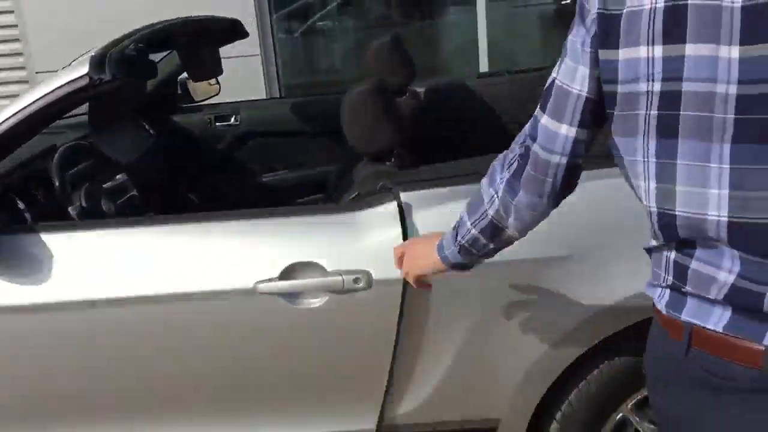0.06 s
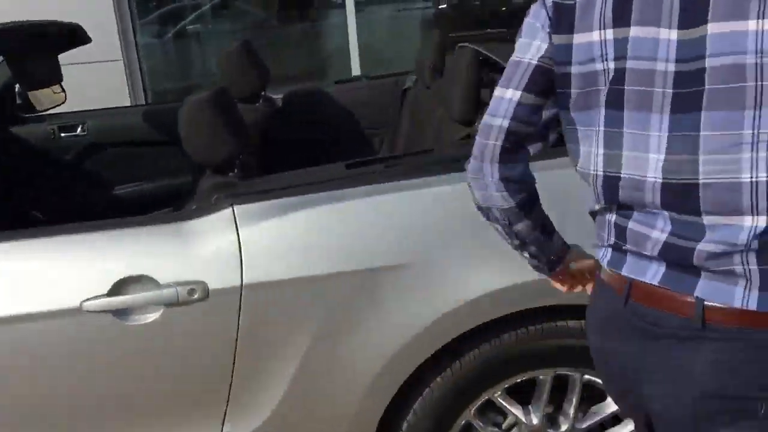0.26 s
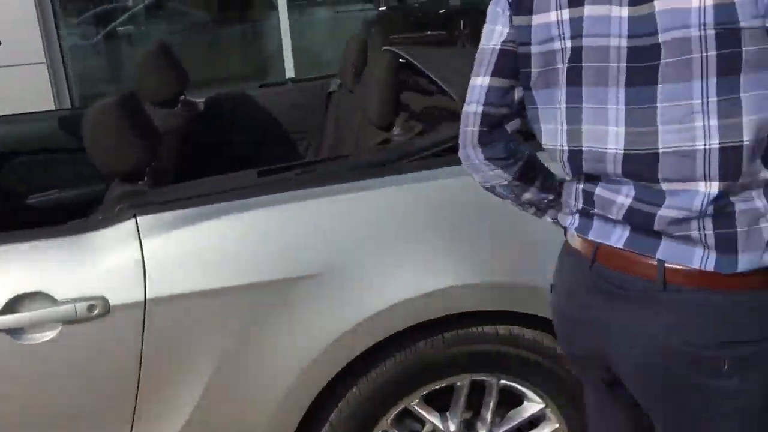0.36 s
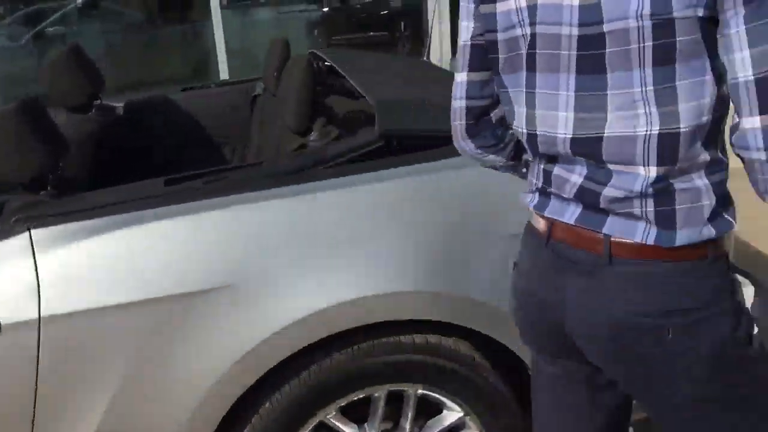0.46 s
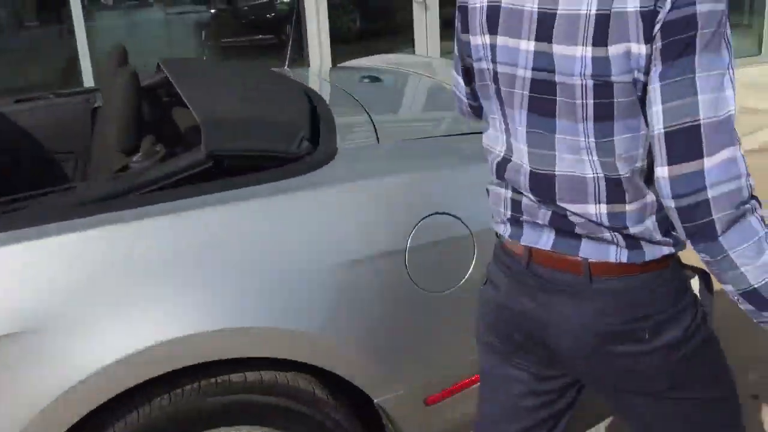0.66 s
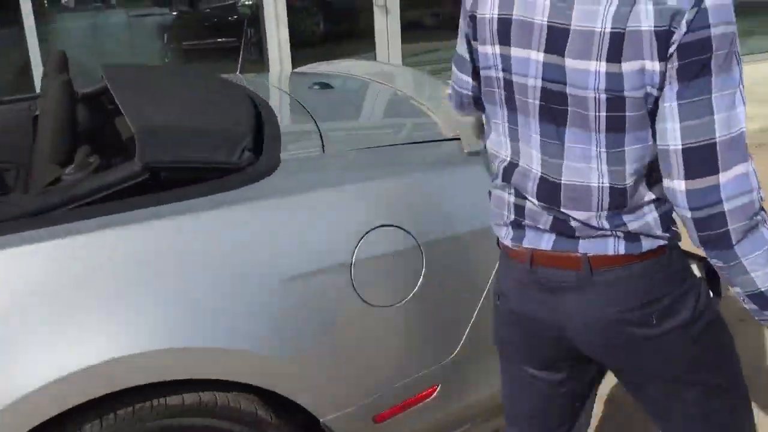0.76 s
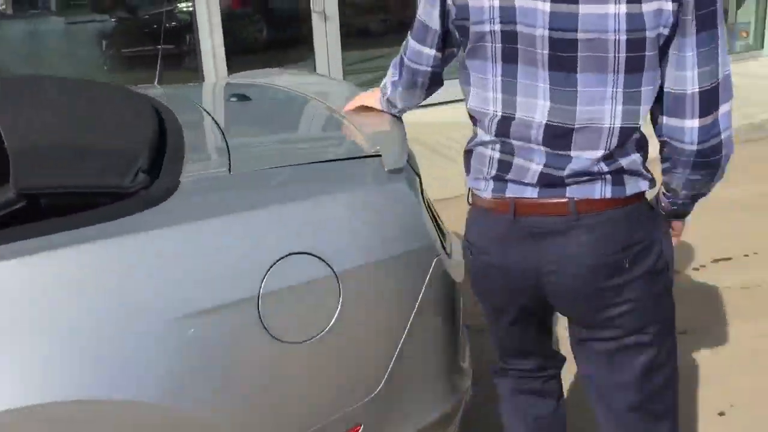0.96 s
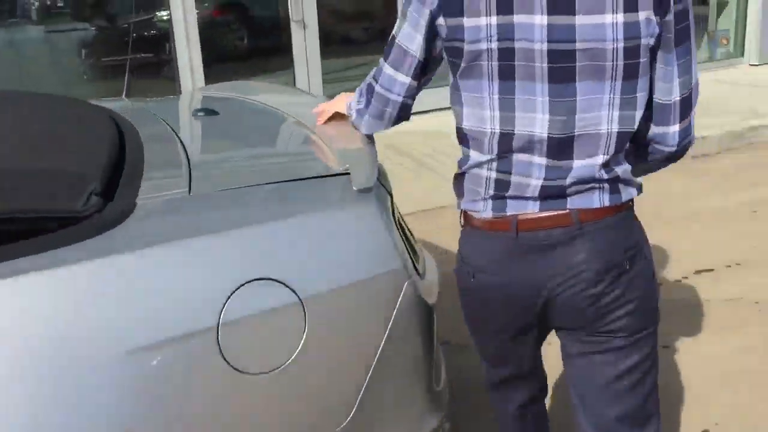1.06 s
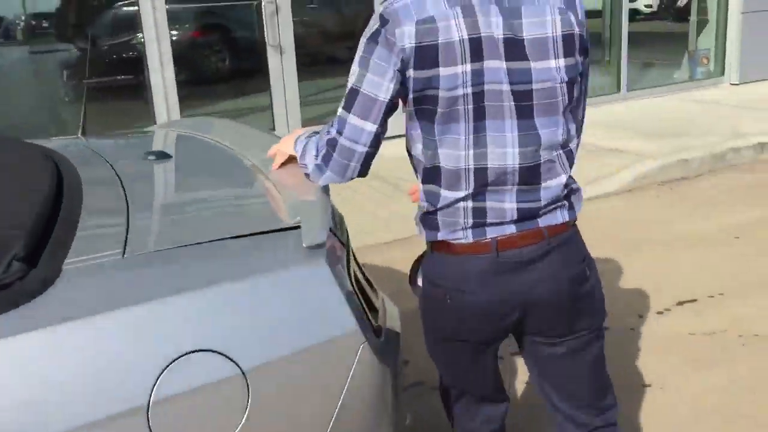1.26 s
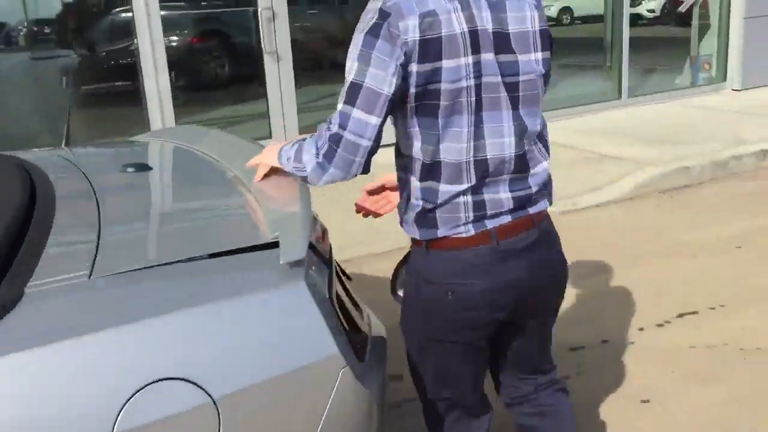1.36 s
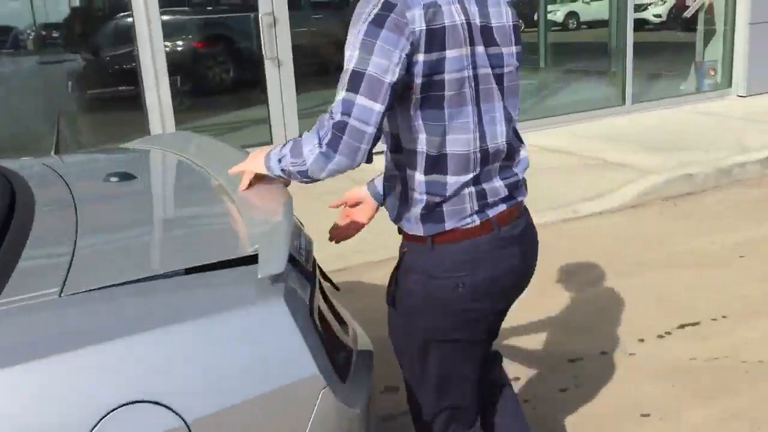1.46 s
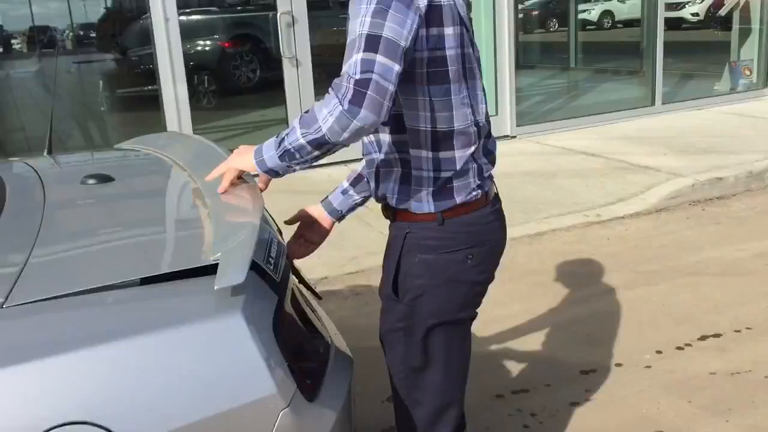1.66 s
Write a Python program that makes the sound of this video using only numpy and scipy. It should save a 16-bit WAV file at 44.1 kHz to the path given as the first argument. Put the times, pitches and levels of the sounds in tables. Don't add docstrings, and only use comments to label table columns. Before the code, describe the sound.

A car door slams at about 0.23 seconds: a sharp latch clack, heavy blows on the seal, booming cabin and rattling trim, settling by 0.4 with a short echo off a nearby wall. It overloads the close microphone. Wind thumps follow around 0.4 to 0.8, grit snaps and crunches underfoot near 1.24, and a strong wind thump hits at 1.47. Distant traffic hums and tyres hiss faintly.

```python
import sys
import numpy as np
from scipy import signal
from scipy.fft import rfft, irfft
from scipy.io import wavfile
from scipy.ndimage import uniform_filter1d

SR = 44100
rng = np.random.default_rng(int(sys.argv[2]) if len(sys.argv) > 2 else 0)


def how_loud(loudness_db):
    steps = np.asarray(loudness_db, float) / 20
    return 10 ** steps


def put_to_file(sound):
    columns = np.atleast_2d(sound).T
    safe = np.clip(columns, -1, 1)
    whole_steps = np.round(safe * 32767)
    wavfile.write(sys.argv[1], SR, whole_steps.astype(np.int16))


N = 74970
TIME = np.arange(N) / SR

# frequency in Hz, level in dB per Hz.
TRAFFIC_TONE = [(150, -4), (300, -9), (500, -13), (1050, -8), (2300, -21), (3500, -32), (6500, -43),
                (9000, -60)]
# time in seconds, level in dB.
TRAFFIC_SWELL = [(0.0, -48.5), (.45, -48.5), (.63, -48), (.93, -45.5), (1.3, -46), (1.48, -46), (1.7, -48)]
# frequency in Hz, level in dB per Hz.
TYRE_TONE = [(1700, -4.5), (2600, 2.5), (4000, -9.5), (5800, -10.5), (7000, -19.5), (10000, -23)]
# time in seconds, level in dB.
TYRE_SWELL = [(0, -60.5), (.2, -61), (.45, -64), (.65, -68), (.9, -66), (1.3, -66), (1.5, -78), (1.7, -82)]
# time in seconds, level in dB.
GUST_STRENGTH = [(0, -43.5), (.05, -37.5), (.1, -51), (.13, -30), (.21, -29), (.228, -36), (.4, -23.5),
                 (.49, -35), (.62, -33), (.78, -34.5), (.94, -43.5), (.98, -38), (1.2, -39.5), (1.235, -53),
                 (1.32, -39), (1.42, -42.5), (1.5, -29), (1.7, -34)]
# frequency in Hz, level in dB per Hz.
WIND_TONE = [(12, -52), (20, -10), (71, 7), (140, -2), (251, -11), (358, -15.5), (528, -31), (700, -22),
             (910, -93), (1540, -120)]
# middle in seconds, level in dB, pitch in Hz, cycles.
BUFFETS = [(0.127, -28, 150, 1.7), (0.163, -15, 190, 1.04), (.186, -19.5, 120, 2.9), (0.201, -14, 141, 1.3),
           (0.416, -14.5, 150, 1.25), (0.442, -21.5, 86, 2.6), (0.514, -13, 150, 1.4),
           (.532, -10.5, 100, 0.77), (.553, -15, 84, 2.35), (0.638, -24.5, 295, 2.9),
           (.6405, -29.5, 600, 1.1), (0.6442, -30, 500, 1.4), (0.652, -18.5, 172, 2.6),
           (.70, -25.5, 110, 4.3), (.620, -25, 130, 1.5), (.722, -24, 179, 2.3), (0.759, -28, 131, 3.2),
           (0.774, -25.5, 90, 1.8), (1.046, -20.5, 189, 1.5), (1.152, -26, 173, 2.1),
           (1.201, -29.5, 140, 2.5), (1.305, -31.5, 120, 1.2), (1.339, -34, 75, 1.8),
           (1.4575, -24.5, 600, 1.1), (1.459, -19.5, 330, 1.26), (1.469, -3.5, 203, 1.2),
           (1.482, -10.5, 86, 2.05), (1.511, -16.5, 152, 1.63), (1.532, -24, 90, 1.3),
           (1.571, -18.5, 182, 0.81), (1.607, -33, 110, 2.4), (1.624, -25.5, 220, 1.4),
           (1.695, -20, 258, 1.3)]
# middle in seconds, level in dB, length in ms.
TEARS = [(0.152, -36, 28), (0.201, -38.5, 18), (0.383, -31, 39), (0.521, -37.5, 22), (0.642, -30, 21),
         (0.673, -47, 20), (1.26, -36.5, 43), (1.308, -40.5, 20), (1.471, -27.5, 24), (1.51, -39.5, 26.7),
         (1.628, -41.5, 22), (1.695, -32, 15)]
# frequency in Hz, level in dB per Hz.
TEAR_TONE = [(150, -15), (300, -1), (550, -4), (800, -12), (1200, -28)]
# start in seconds, level in dB, ring in Hz, time to fade 60 dB in ms.
GRIT_SNAPS = [(.4566, -36, 3980, 30), (.8251, -47.5, 8400, 22), (1.2397, -12.5, 6500, 1.8),
              (1.2408, -7, 3830, 3), (1.2421, -12, 1000, 5), (1.2475, -24, 5500, 3.2),
              (1.2494, -26.5, 4100, 4.2), (1.2564, -30, 6500, 6), (1.2597, -23, 5600, 3),
              (1.2598, -37, 14500, 3), (1.2674, -34, 8000, 3.9), (1.2676, -39, 14500, 2.8),
              (1.2841, -34, 4600, 8), (1.3061, -30, 4570, 7), (1.3647, -34, 8300, 12),
              (1.3647, -19, 3600, 8), (1.3646, -27, 1800, 6), (1.3831, -41, 4100, 11),
              (1.4408, -30, 2900, 5), (1.4481, -30, 2400, 5), (1.4850, -50, 8500, 3),
              (1.6991, -34.5, 7000, 3.6)]
# start in seconds, level in dB, ring in Hz, time to fade 60 dB in ms.
DOOR_TICKS = [(.2175, -49, 8000, 3), (.2372, -21, 9000, 5), (.2408, -14, 3400, 6), (.2437, -23, 7000, 5),
              (.2480, -25, 13000, 6), (.2502, -13, 5000, 4), (.2640, -13, 6500, 5), (.2705, -20, 5000, 5),
              (.2798, -17, 6500, 4), (.2800, -29, 14500, 3), (.2865, -14, 8060, 6), (.3090, -23, 7000, 7),
              (.3311, -24, 3600, 8), (.3430, -32, 5000, 12), (.3860, -46, 9500, 7)]
# time in seconds, level in dB.
TRIM_SHAKE = [(.226, -44.5), (.242, -18), (.256, -21.5), (.266, -18), (.287, -20), (.296, -29.5),
              (.326, -34.5), (.335, -24.5), (.352, -47.5)]
# frequency in Hz, level in dB per Hz.
TRIM_TONE = [(240, -17), (400, -6.5), (732, 0), (886, -5.5), (1280, -8), (1700, -12.5), (6270, -25.5),
             (16800, -43), (17900, -45.5)]
CLATTER_HZ = [1285, 2088, 2720, 3420, 4340, 5150, 5840, 6290, 7810]
# start in seconds, level in dB.
LATCH_STRIKES = [(0.2265, -3), (.2293, -10), (.2325, -16), (.2362, -10), (.2405, -8), (.2440, -11.5),
                 (.2478, -8), (.2545, -11.5), (.2627, -11.5), (.269, -15), (.2755, -12), (.283, -14.5),
                 (.290, -16.5), (.297, -16), (.305, -19.5), (.318, -24), (.330, -21.5), (.336, -22),
                 (.343, -21.5), (.354, -30), (.368, -37.5), (.385, -38), (.4567, -34)]
# frequency in Hz, level in dB, time to fade 60 dB in seconds.
PANEL_RINGS = [(728, -2.5, 0.1), (824, -3.5, 0.029), (858, 2, 0.034), (940, -1.5, 0.082),
               (1064, -5.5, 0.061), (1137, -3, 0.088), (1298, -3.5, 0.046), (1578, -12, 0.05),
               (1800, -14, .05), (2070, -6.5, 0.04), (2380, -6.5, .05), (2750, -10.5, 0.031),
               (3410, -12, .03)]
# frequency in Hz, level in dB, time to fade 60 dB in seconds.
CABIN_RINGS = [(49.7, -3, 0.49), (68, -13, 0.4), (85.9, -4, .55), (120, 1, 0.21), (148.3, -1, 0.24)]
# start in seconds, level in dB, contact in ms.
SEAL_BLOWS = [
    (0.2386, -9, 3.1),
    (0.2447, -5, 2.2),
    (0.2512, -0.5, 3.65),
    (.263, -1, 2.63),
    (0.28, -4, 4.85),
    (.299, -7.5, 3.5),
    (.315, -3, 6.2),
    (.333, -10, 2.6),
    (.345, -29, 2.5),
    (.375, -31, 2.8),
]
# frequency in Hz, level in dB, time to fade 60 dB in seconds.
SHELL_RINGS = [(79.25, -6.5, 0.18), (166.4, -8, 0.23), (202.9, -6, 0.36), (259, -7.5, 0.14),
               (290, -9, 0.12), (318.3, -6, 0.25), (371.4, -12, 0.19), (512, -8, .1), (604, -9, .12)]

CRUNCH_S, CRUNCH_DB, CRUNCH_T60_S = 1.24, -41, 0.17
PUSH_S, PUSH_DB = 0.2405, -4.5


def unit(x):
    return x / np.sqrt(np.mean(x ** 2))


def noise():
    return rng.standard_normal(N)


def fade(t, t60_s):
    return np.exp(-np.log(1000) * t / t60_s)


def curve(rows):
    points = np.array(rows)
    return how_loud(np.interp(TIME, points[:, 0], points[:, 1]))


def colour(x, points):
    p = np.array(points)
    hz = np.maximum(np.arange(N // 2 + 1) * SR / N, 1)
    db = np.interp(np.log(hz), np.log(p[:, 0]), p[:, 1], left=-80, right=-80)
    return irfft(rfft(x) * how_loud(db), N)


def walk(rate_hz):
    hold = int(SR / rate_hz)
    steps = np.repeat(rng.standard_normal(N // hold + 1), hold)
    return 1.1 * uniform_filter1d(uniform_filter1d(steps, hold), hold)[:N]


def add(out, start_s, x):
    i = max(int(start_s * SR), 0)
    out[i:i + len(x)] += x[:N - i]


def flickering_bands(x, low_hz, per_octave, count, flicker_db, rate_hz):
    spectrum = rfft(x)
    hz = np.maximum(np.arange(len(spectrum)) * SR / N, 1)
    place = per_octave * np.log2(hz / low_hz)
    out = np.zeros(N)
    for k in range(count):
        share = np.sqrt(np.clip(1 - abs(place - k), 0, 1))
        out += how_loud(flicker_db * walk(rate_hz)) * irfft(spectrum * share, N)
    return out


def ring(modes, scatter_db, chance):
    m = np.array(modes)
    count = len(m)
    t = np.arange(SR // 2)[:, None] / SR
    detune = chance[count:2 * count]
    gain = how_loud(m[:, 1] + scatter_db * chance[:count]) * np.sign(detune)
    hz = m[:, 0] * (1 + 0.0219 * detune)
    return (gain * fade(t, m[:, 2]) * np.sin(2 * np.pi * hz * t)).sum(axis=1)


def tap(modes, scatter_db, contact_ms):
    push = np.hanning(int(contact_ms * SR / 1000) + 3)
    return np.convolve(ring(modes, scatter_db, rng.standard_normal(28)), push / push.sum())


def snaps(rows):
    out = np.zeros(N)
    t = np.arange(SR // 20) / SR
    for start_s, db, hz, ms in rows:
        longness = 1 + (ms / 10.3) ** 2
        b, a = signal.iirpeak(min(hz, 0.4 * SR), 1.27 * longness, SR)
        spike = 3.0 / longness * (t < 1 / SR)
        fizz = 0.5 * np.sqrt(longness) * fade(t, ms / 1000) * rng.standard_normal(len(t))
        once = signal.lfilter(b, a, spike + fizz)
        add(out, start_s, how_loud(db) * signal.lfilter(b, a, once))
    return out


def traffic():
    hum = unit(colour(noise(), TRAFFIC_TONE))
    return curve(TRAFFIC_SWELL) * how_loud(0.5) * flickering_bands(hum, 150, 2, 15, 0.55, 7.56)


def tyres():
    hiss = unit(colour(noise(), TYRE_TONE))
    return curve(TYRE_SWELL) * flickering_bands(hiss, 1700, 3, 9, 2.8, 17)


def cloth():
    middle_s, level_db, length_ms = 1.04, -73, 30
    brush = np.exp(-((TIME - middle_s) * 1000 / length_ms) ** 2)
    return how_loud(level_db) * brush * unit(colour(noise(), [(12500, -6), (14500, 0), (16500, -6)]))


def wind():
    sag = 0.54
    out = curve(GUST_STRENGTH) * how_loud(2.5 * walk(30)) * unit(colour(noise(), WIND_TONE))
    for middle_s, db, hz, cycles in BUFFETS:
        half_s = cycles / hz
        u = np.arange(-half_s, half_s, 1 / SR) / half_s
        phase = 2 * np.pi * cycles * (u - sag * u ** 2 / 2)
        add(out, middle_s - half_s, how_loud(db) * np.exp(-(u / 0.4) ** 2) * np.sin(phase - 0.8))
    return out


def tearing_air():
    swell = np.zeros(N)
    for middle_s, db, ms in TEARS:
        swell += how_loud(db) * np.exp(-((TIME - middle_s) / ms * 1000 / 0.5) ** 2)
    return swell * unit(colour(noise(), TEAR_TONE))


def grit():
    since = TIME - CRUNCH_S
    dust = (rng.random(N) < 12000 / SR) * noise()
    tone = [(700, -4), (1500, -1.0), (4000, 1.5), (6000, -4), (8000, -15), (18000, -19)]
    fading = (since > 0) * fade(np.maximum(since, 0), CRUNCH_T60_S)
    return snaps(GRIT_SNAPS) + how_loud(CRUNCH_DB) * fading * unit(colour(dust, tone))


def trim_rattle():
    clicks_per_s, spread_db, level_db = 6000, 3, 4.5
    settle_s, dull_s = 0.014, 0.094
    loudness = how_loud(spread_db * rng.exponential(size=N))
    clicks = (rng.random(N) < clicks_per_s / SR) * loudness * noise()
    trim = unit(colour(clicks, TRIM_TONE))
    clatter = sum(signal.lfilter(*signal.iirpeak(hz, 40, SR), trim) for hz in CLATTER_HZ)
    trim = unit(trim + how_loud(1.5) * clatter)
    soft = uniform_filter1d(trim, size=5)
    brightness = 1.21 * np.exp(-(np.maximum(TIME - PUSH_S, 0) / dull_s) ** 2)
    trim = soft + (trim - soft) * brightness
    first_s, last_s = TRIM_SHAKE[0][0], TRIM_SHAKE[-1][0]
    settling = np.exp(-np.maximum(TIME - last_s, 0) / settle_s)
    shaking = curve(TRIM_SHAKE) * (TIME > first_s) * settling
    return how_loud(level_db) * shaking * how_loud(1.36 * walk(199.3)) * trim


def latch():
    first_touch_ms, strike_ms = 0.9, 0.34
    out = np.zeros(N)
    for start_s, db in LATCH_STRIKES:
        contact_ms = strike_ms if start_s > LATCH_STRIKES[1][0] else first_touch_ms
        add(out, start_s, how_loud(db - 6.0) * tap(PANEL_RINGS, 2.56, contact_ms))
    return out


def cabin():
    out = np.zeros(N)
    alternating = (-1.0) ** np.arange(28)
    boom = np.convolve(ring(CABIN_RINGS, 0, alternating), np.hanning(150) / 75)
    add(out, PUSH_S, how_loud(PUSH_DB) * boom)
    return out


def door_shell():
    shell_db, scatter_db = -5.5, 3.5
    out = np.zeros(N)
    for start_s, db, contact_ms in SEAL_BLOWS:
        add(out, start_s, how_loud(db + shell_db) * tap(SHELL_RINGS, scatter_db, contact_ms))
    return out


def door():
    return snaps(DOOR_TICKS) + trim_rattle() + latch() + cabin() + door_shell()


def shop_front_echo(near):
    level_db, t60_s = -19, 0.22
    t = np.arange(SR // 2) / SR
    tail = signal.lfilter([0.4], [1, -0.6], rng.standard_normal(len(t)))
    tail = tail * fade(t, t60_s) * (t > 0.012)
    return how_loud(level_db) * signal.fftconvolve(near, tail / np.sqrt(np.sum(tail ** 2)))[:N]


def scene():
    near = door() + grit()
    around = traffic() + tyres() + cloth() + wind() + tearing_air()
    return (near + shop_front_echo(near) + around)[None]


def band_limit(x):
    return signal.sosfilt(signal.butter(12, 18050, fs=SR, output="sos"), x)


def record(dry):
    low_cut_hz, port_hz, port_db, hiss_db = 41.5, 16900, 1, -71.5
    hiss = unit(colour(noise(), [(3000, 0.5), (17500, -7.5)]))
    x = signal.sosfilt(signal.butter(2, low_cut_hz, "high", fs=SR, output="sos"), dry)
    port = signal.lfilter(*signal.iirpeak(port_hz, 8, SR), x)
    x = x + how_loud(port_db) * port + how_loud(hiss_db) * hiss
    x = x / (1 + abs(x) ** 6) ** (1 / 6)
    return band_limit(x)


dry = scene()
out = record(dry)
put_to_file(out)
```